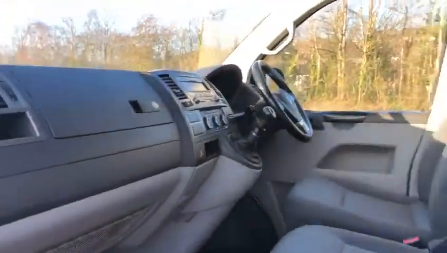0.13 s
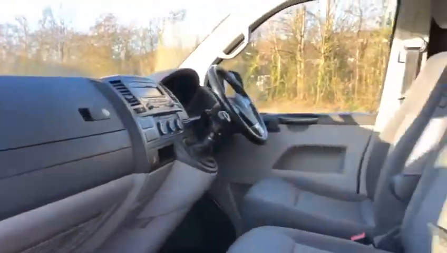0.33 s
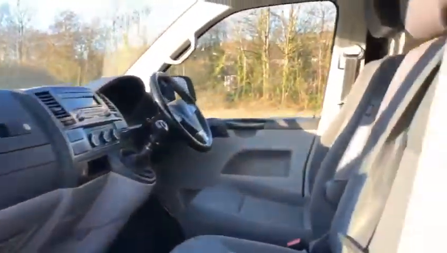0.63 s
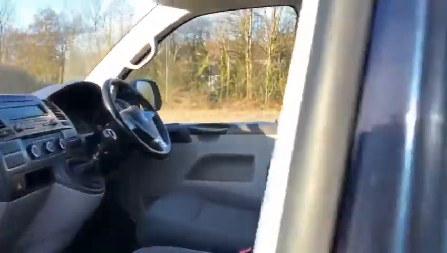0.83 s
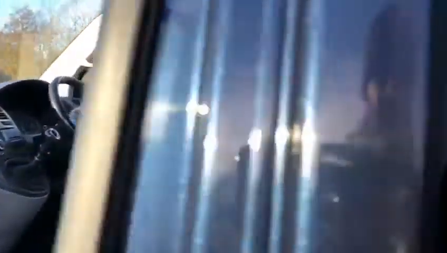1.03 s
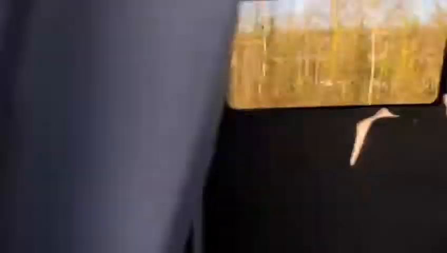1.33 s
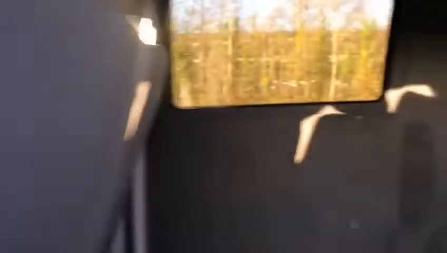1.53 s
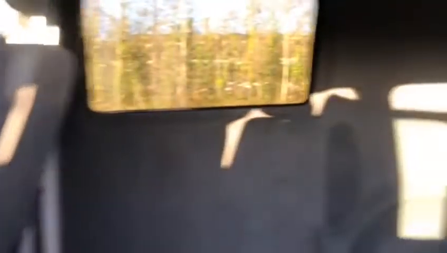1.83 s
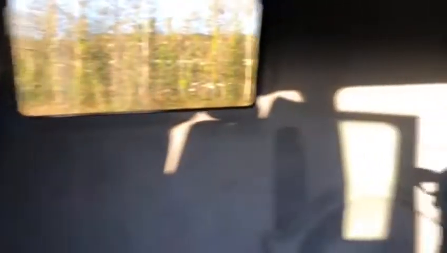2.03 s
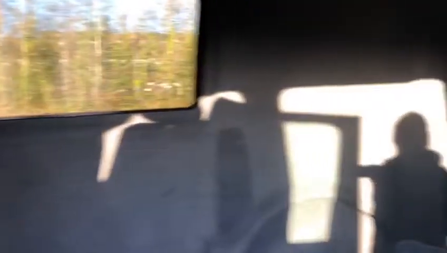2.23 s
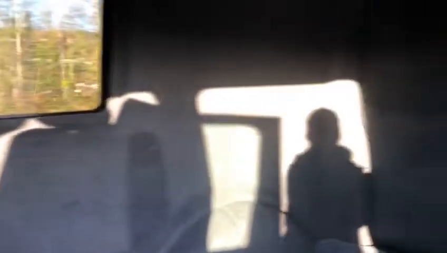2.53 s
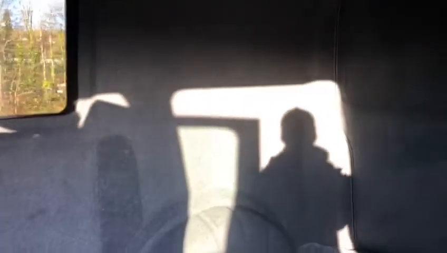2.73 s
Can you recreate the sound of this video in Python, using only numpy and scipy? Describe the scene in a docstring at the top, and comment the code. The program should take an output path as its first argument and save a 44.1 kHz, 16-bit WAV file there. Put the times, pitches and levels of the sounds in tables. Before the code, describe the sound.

A van's sliding door, close up in a quiet car park. Faint handle ticks and a click at 0.1 s, then a sharp crack and loud, deep multiple clunk at 0.2-0.35 s. Rollers rumble from about 0.6 s with uneven panel boom; a rough metallic squeak rises at 1.2-1.45 s. Small ticks follow, then a gritty rattle with thin steel whistles at 2.35-2.65 s, fading to faint hum.

```python
"""A van's sliding side door, heard from close by: its rollers rumble along the rails, as filtered noise.
Damped modes make the clunk of the door leaving its frame, and the knocks of the roller brackets.
Band-limited contacts make ticks of handle, latch and rollers; random slips on rail resonances make a squeak
on the bend; grit pings and steel whistles join the rattle over the catch near the end stop.
A quiet car park hums behind, as steady coloured noise."""
import sys
import numpy as np
from scipy import signal
from scipy.fft import rfft, irfft, next_fast_len
from scipy.io import wavfile
from scipy.ndimage import map_coordinates

SR = 44100
rng = np.random.default_rng(int(sys.argv[2]) if len(sys.argv) > 2 else 0)


def unload_wav(signal):
    """Save mono or channel-first audio to the path in sys.argv[1] as 16-bit WAV at rate SR, clipped to [-1, 1]."""
    wavfile.write(
        sys.argv[1],
        SR,
        np.round(np.clip(np.atleast_2d(signal).T, -1, 1) * 32767).astype(np.int16),
    )


def elevation(decibels):
    """Turn decibel levels (scalar or array-like) into linear amplitude ratios."""
    levels = np.asarray(decibels, float)
    return 10 ** (levels / 20)


N = 127890  # length [samples]

# Spectrum of the car park: (frequency [Hz], relative density [dB])
PARK_SPECTRUM = [(65, -7), (110, 6.5), (337, -14), (529, -8.5), (1330, -16), (6530, -36), (10300, -38.5),
                 (11300, -27), (12000, -73), (15600, -99), (22000, -120)]
PARK_DB = -48

# Answer of the load space to the metal sounds
CABIN_DB, CABIN_T60_S = -22.5, 0.072

# Grit crunching under the catch: (start [s], end [s], level [dB], grain rate [1/s], at most 99 grains)
GRIT_BURSTS = [(0.064, 0.214, -51.5, 260), (0.422, 0.483, -50, 830), (0.658, 0.846, -49.5, 730),
               (1.973, 2.05, -51.5, 900), (2.337, 2.498, -42.5, 600), (2.51, 2.667, -50.5, 300)]
GRAIN_HZ, GRAIN_OCTAVES, GRAIN_CYCLES, GRAIN_SPREAD_DB = 3500, 0.8, 5, 3

# Thin whistles of steel sliding on steel: (start [s], length [s], frequency [Hz], level [dB])
WHISTLE_TONES = [(2.35, .07, 8900, -49), (2.387, .032, 10200, -32), (2.415, .02, 10200, -48),
                 (2.378, .03, 3950, -46), (2.395, .03, 5100, -50), (2.4, .033, 2600, -40),
                 (2.565, .025, 3300, -50), (2.4, .012, 7600, -52), (2.355, .035, 2200, -45),
                 (2.37, .02, 5800, -54), (1.795, .05, 2750, -55), (2.275, .02, 3800, -50)]
WHISTLE_WAVER_RAD, WHISTLE_FLUTTER_DB = 0.65, 2.5

# Metal ticks of handle, latch and rollers:
# (time [s], level [dB], centre frequency [Hz], bandwidth scale [octaves], scatter t60 [s])
METAL_TICKS = [(.019, -29.5, 4840, 2.1, 0.037), (.028, -44, 7460, 0.25, 0.066),
               (.1, -20.5, 1110, 1.03, 0.06), (0.2149, -13.5, 4700, 1.3, 0.09),
               (0.217, -3.5, 5100, 1.2, 0.011), (0.22, -13.5, 2700, 0.74, 0.099),
               (0.102, -38, 4340, 0.16, 0.13), (0.098, -40, 6470, 0.4, 0.078),
               (.301, -20.5, 8300, 1.1, 0.055), (.308, -44, 7900, 1.2, 0.074),
               (0.318, -35, 6960, 0.77, 0.068), (0.325, -32, 3600, 0.39, 0.043),
               (.2755, -27.5, 3800, 0.96, 0.079), (0.231, -24.5, 3000, 0.42, .07),
               (.61, -52, 8500, .5, .05), (.707, -53, 5000, 1.2, 0.065), (0.727, -54, 4000, 1.6, .06),
               (0.791, -43, 8850, 0.71, 0.27), (2.009, -44, 5000, 1.6, 0.11), (2.131, -45, 5000, 0.87, .06),
               (.408, -45, 3360, 0.18, 0.054), (0.419, -40.5, 8800, 0.89, 0.23),
               (0.46, -39.5, 4900, 3.3, 0.083), (0.658, -43.5, 4950, 1.2, 0.15),
               (0.753, -39, 4000, 1.3, 0.12), (0.8241, -23.5, 2830, 1.36, 0.077),
               (1.069, -38, 3540, 0.99, 0.11), (1.138, -28.5, 7000, 0.77, 0.018),
               (1.327, -29.5, 2200, 3.1, 0.043), (1.451, -36.5, 5000, 0.97, 0.3),
               (1.595, -41.5, 7000, 1.2, 0.071), (1.651, -33, 3970, 2.6, 0.062),
               (1.7135, -44, 7000, 1.4, .05), (1.985, -43.5, 4000, 1.5, 0.16),
               (2.165, -40.5, 7060, 1.3, 0.07), (2.217, -31.5, 5800, 2.4, 0.06),
               (2.277, -40, 4000, 1.1, 0.071), (2.338, -55, 8000, 1, .04), (2.346, -21.5, 7040, 1.5, 0.035),
               (2.434, -30, 3470, 1.9, 0.036), (2.46, -32, 8100, .9, .03), (2.466, -15.5, 7900, 0.58, 0.04),
               (2.4665, -22, 2600, 1, 0.04), (2.346, -38, 2210, 0.58, 0.097), (2.521, -35, 3000, 1.4, .05),
               (2.535, -39, 6200, .2, .05), (2.535, -36, 3500, 0.33, 0.038), (2.521, -41, 9000, .5, 0.026),
               (2.41, -44, 3000, 0.59, .05), (2.559, -26.5, 2320, 0.67, 0.06),
               (2.593, -29, 4830, 0.67, 0.045), (2.638, -34, 3500, 0.3, 0.041),
               (2.646, -29, 2830, 0.54, 0.045)]

# Hollow knocks of the roller brackets:
# (time [s], relative level [dB], centre frequency [Hz], decay scale [times mode t60])
BRACKET_KNOCKS = [(.022, -20.5, 600, 0.69), (0.021, -28.5, 2140, 0.55), (.1, -19.5, 620, 0.76),
                  (.103, -38, 1600, 0.64), (0.22, -11, 1280, 0.59), (0.25, -12.5, 1350, 0.33),
                  (.283, -10, 750, 0.58), (.229, -10, 1000, .9), (.456, -23.5, 725, 0.89),
                  (.766, -29, 1200, 0.4), (0.825, -21, 1050, 1.3), (.828, -25.5, 2220, 1.6),
                  (1.327, -11, 980, 0.47), (0.061, -24.5, 1100, 0.63), (2.346, -30.5, 2400, 0.88),
                  (2.34, -26.5, 790, 1), (2.28, -21.5, 1800, 0.63), (2.468, -26.5, 1600, 0.39),
                  (2.521, -15.5, 800, 0.81), (2.4, -26, 1900, 1.4), (2.596, -21.5, 920, 0.59),
                  (2.561, -26, 900, 0.94), (2.476, -26, 900, 0.74), (2.646, -36.5, 2000, 2)]
# Modes of a bracket: (frequency [Hz], unscaled t60 [s])
BRACKET_MODES = [(610, 0.11), (790, 0.058), (965, 0.045), (1120, 0.036), (1400, 0.12), (1610, 0.051),
                 (1850, 0.048), (2150, 0.031), (2400, 0.03), (3240, 0.12)]
KNOCK_OCTAVES, MODE_SCATTER_DB = 0.4, 2

# A roller scraping on the bend, one level for each group of rail resonances in turn:
# (time [s], group 1 level [dB], group 2 level [dB], group 3 level [dB], group 4 level [dB])
SQUEAK_LEVELS = [(1.04, -63, -62, -59, -75), (1.086, -46, -52, -52, -73), (1.116, -62, -61, -57, -72),
                 (1.134, -51, -40, -52, -65), (1.184, -48, -56, -50, -67), (1.198, -38, -46, -50, -66),
                 (1.21, -31, -29, -37, -53), (1.22, -27, -37, -46, -46), (1.234, -20, -40, -48, -40),
                 (1.26, -30.5, -45, -61, -64), (1.268, -33, -42, -62, -46), (1.296, -30.5, -24, -38.5, -49),
                 (1.312, -32.5, -32, -45, -43), (1.33, -33, -28.5, -36, -70), (1.358, -49, -41, -66, -67),
                 (1.374, -29.5, -46, -41, -46), (1.392, -32, -42, -54, -55), (1.404, -32, -42, -50, -55),
                 (1.422, -44, -42, -54, -63), (1.466, -39, -31, -41, -67), (1.5, -46, -45, -54, -79),
                 (1.54, -51, -49, -52, -54.5), (1.582, -59, -72.5, -59, -72), (1.6, -52, -59, -63, -58)]
# Four groups of rail resonances, before sharpening: (frequency [Hz], width [Hz], gain [dB])
RAIL_GROUPS = [
    [(1860, 70, 0), (2030, 200, -8), (3760, 160, -12)],
    [(1585, 90, 0), (1700, 160, -2)],
    [(3100, 220, 0), (3350, 250, -2)],
    [(5700, 600, -4), (6440, 500, -3), (7570, 500, -3), (8700, 400, 0), (9400, 700, -3)],
]
SLIPS_PER_S, SLIP_SPREAD_DB = 1500, 3

# Door panels ringing as it rolls; the last two levels are relative to RING_SHARE_DB:
# (time [s], big panel level [dB], middle panels level [dB], small panels level [dB])
PANEL_LEVELS = [(0.4, -33, -24, -42), (0.45, -50, -32, -37), (0.62, -42.5, -32.5, -40),
                (0.69, -36, -26.5, -29), (0.77, -25, -26, -39), (0.86, -23.5, -23.5, -32.5),
                (0.89, -36, -40, -37), (0.92, -26, -22.5, -30), (1.03, -31, -31.5, -38),
                (1.07, -38, -20, -37), (1.1, -29, -30, -33.5), (1.22, -32, -26, -24.5),
                (1.25, -20.5, -26, -23), (1.31, -22.5, -48, -34), (1.34, -26, -17.5, -26),
                (1.4, -18.5, -30.5, -30), (1.53, -17, -26.5, -29), (1.56, -35, -29, -35),
                (1.59, -19.5, -33, -27), (1.74, -25.5, -40, -33), (1.76, -27.5, -34.5, -35),
                (1.85, -19.5, -24, -28), (1.87, -31, -39, -33), (1.89, -27, -22, -42),
                (1.98, -17.5, -32, -31), (2.11, -27, -30, -29.5), (2.19, -24, -27.5, -47),
                (2.23, -18, -35, -28.5), (2.36, -20.5, -27.5, -36), (2.38, -31.5, -38, -40),
                (2.44, -23, -51, -52), (2.47, -24.5, -24, -27), (2.5, -23, -41, -47),
                (2.54, -40, -41, -28.5), (2.58, -19.5, -43, -29), (2.64, -24.5, -41, -46),
                (2.69, -44, -36.5, -45), (2.73, -36, -35, -68), (2.79, -37, -46, -70),
                (2.85, -39, -53, -61)]
# Resonances of the middle panels: (frequency [Hz], width of one of two stages [Hz])
MIDDLE_PANELS = [(215, 32.3), (257, 41), (300, 38.4)]
# Resonances of the small panels: (frequency [Hz], width of one of two stages [Hz])
SMALL_PANELS = [(405, 40), (450, 51), (505, 52)]
BOOM_HZ, BOOM_WIDTH_HZ = 116.1, 25.9  # big panel, same columns
RING_SHARE_DB, PANEL_TOP_HZ = -3, 700
EVENNESS = 0.6  # 0 = free noise, 1 = steady strength

# The door jolting out of its frame:
# (time [s], strength [dB], contact softness [ms], extra level of the deep modes [dB])
DOOR_JOLTS = [(0.218, -15, 0.16, -17), (.229, -3.5, 1.4, -13), (.247, -5.5, 0.96, -2),
              (.276, -9.5, 0.66, 3.5), (.284, -13, 0.72, -7), (.297, -12.5, 0.78, -10),
              (0.326, -15, 1.8, -8)]
# Modes of the door: (frequency [Hz], relative level [dB], t60 [s])
DOOR_MODES = [(43.9, -2.5, 0.36), (62, -11.5, 0.6), (105, -20, 0.34), (153, -16, 0.29), (211.6, -6, 0.04),
              (266, -4, 0.26), (298.5, -4, 0.18), (356, -8.5, 0.31), (478, -5, 0.056), (588, -15, 0.17),
              (674, -9, 0.2), (840, -1.5, 0.033), (967, -8.5, 0.24), (1250, -18, .08), (1360, -32, 0.041),
              (1660, 3, 0.028), (1890, -26, 0.02)]
# Spectrum of loose panels shaken by a jolt: (frequency [Hz], relative density [dB])
CLATTER_SPECTRUM = [(71, -31), (120, 0.5), (297, -6), (884, -19), (987, -25), (1080, -22), (1650, -27),
                    (5000, -57), (6500, -81), (11000, -120)]
DEEP_HZ, CLATTER_DB, CLATTER_T60_S = 130, -2.5, 0.12

# Course of the rolling:
# (time [s], rumble level [dB], body sway over rumble [dB], rail hiss over rumble [dB])
ROLL_LEVELS = [(0.0, -50, -10, -26), (0.05, -36.5, -5, -19), (0.1, -36.5, -11, -15),
               (0.19, -35.5, -9, -10.5), (0.25, -38.5, 32.5, -7), (0.31, -32.5, 18.5, -35),
               (0.41, -34, 3, -50), (0.51, -34, 9, -53), (0.64, -30, -4, -28), (0.68, -30, 2, -22),
               (0.87, -25, -11.5, -30), (0.94, -31, 5.5, -23), (0.98, -27, -9, -24), (1.02, -30, 8.5, -23),
               (1.16, -24.5, -25, -12), (1.33, -22, -25, -9.5), (1.59, -28, -17, -20.5),
               (2.11, -28.5, -15, -22), (2.45, -28.5, 6, -20), (2.6, -25, -2.5, -19),
               (2.73, -38, 10.5, -30), (2.9, -60.5, 19, 8)]
# Spectrum of the rumble: (frequency [Hz], relative density [dB])
RUMBLE_SPECTRUM = [(70, -17), (100, -10), (170, -12.5), (330, -14.5), (580, -24), (800, -26.5),
                   (1150, -35.5), (1900, -43.5), (3000, -58), (3900, -78), (6600, -120)]
# Spectrum of the rail hiss: (frequency [Hz], relative density [dB])
HISS_SPECTRUM = [(1290, 6), (2200, -3), (2520, -1), (3720, -5), (4940, -14), (9030, -16), (11500, -31),
                 (12000, -47), (15600, -71), (22000, -120)]
# Spectrum of the slow body sway: (frequency [Hz], relative density [dB])
SWAY_SPECTRUM = [(15, -16), (40, 24), (70, 14), (95, 4), (130, -47.5)]
BUMPS_PER_S, BUMP_SPREAD_DB, BUMP_SHARE = 500, 2.5, 0.4  # grit under the rollers

MIC_TOP_HZ, MIC_ORDER = 10900, 9.7
CUT_HZ = 12290  # upper limit of the recorded band


def unit(x):
    """Normalisation: scale to rms 1."""
    return x / np.sqrt(np.mean(x ** 2) + 1e-20)


def curves(rows):
    """Linear interpolation: one value per sample for each column after the time."""
    s, *columns = np.transpose(rows)
    return [np.interp(np.arange(N) / SR, s, column) for column in columns]


def wobble(rate):
    """Spline interpolation: a smooth random curve through `rate` knots a second."""
    knots = rng.standard_normal(int(N * rate / SR) + 4)
    return map_coordinates(knots, [np.arange(N) * rate / SR])


def filtered(x, response):
    """Linear filtering: multiply the spectrum by a response of frequency."""
    m = next_fast_len(len(x) + 8192)
    return irfft(rfft(x, m) * response(np.fft.rfftfreq(m, 1 / SR)), m)[:len(x)]


def coloured(x, points):
    """Spectral shaping: filter by (Hz, dB) points on a log frequency axis, to rms 1."""
    f, db = np.transpose(points)
    return unit(filtered(x, lambda hz: elevation(np.interp(np.log(hz + 1), np.log(f + 1), db))))


def resonance(f, hz, width):
    """Band-pass resonance: the complex response of a damped oscillator, 1 at its centre."""
    return 1j * f * width / (hz * hz - f * f + 1j * f * width)


def add(track, s, sound):
    """Superposition: mix a sound in at a time in seconds."""
    part = track[round(s * SR):][:len(sound)]
    part += sound[:len(part)]


def car_park():
    """Stationary noise: a steady random hum with a fixed spectrum."""
    return elevation(PARK_DB) * coloured(rng.standard_normal(N), PARK_SPECTRUM)


def cabin(x):
    """Reverberation by convolution: the empty load space answers with a short decaying noise tail."""
    t = np.arange(SR // 4) / SR
    tail = rng.standard_normal(len(t)) * elevation(-60 * t / CABIN_T60_S) * (t > 0.004)
    return signal.fftconvolve(x, tail / np.linalg.norm(tail))[:N]


def grit():
    """Granular impact noise: many tiny damped pings at random times and pitches."""
    out, t = np.zeros(N), np.arange(SR // 50) / SR
    for start, end, db, per_s in GRIT_BURSTS:
        length = end - start
        for _ in range(min(int(per_s * length), 99)):
            when = start + rng.random() * length
            hz = min(GRAIN_HZ * 2 ** (GRAIN_OCTAVES * rng.standard_normal()), CUT_HZ)
            ping = np.sin(2 * np.pi * hz * t) * np.exp(-t * hz / GRAIN_CYCLES)
            add(out, when, elevation(db + GRAIN_SPREAD_DB * rng.standard_normal()) * ping)
    return out


def whistles():
    """Narrow-band oscillation: short, nearly pure tones swell and fade with wavering phase and level."""
    out, drift, flutter = np.zeros(N), wobble(rate=300), wobble(rate=200)
    for s, length, hz, db in WHISTLE_TONES:
        t = np.arange(round(length * SR)) / SR
        here = slice(round(s * SR), round(s * SR) + len(t))
        phase = 2 * np.pi * hz * t + WHISTLE_WAVER_RAD * drift[here]
        level = elevation(db + WHISTLE_FLUTTER_DB * flutter[here])
        add(out, s, level * np.sin(np.pi * t / length) * np.sin(phase))
    return out


def ticks():
    """Impulse excitation: a sharp contact and a dying scatter share a band around each tick's pitch."""
    out, t = np.zeros(N), np.arange(SR // 4) / SR
    for s, db, hz, octaves, t60 in METAL_TICKS:
        band = lambda f: np.exp(-(np.log2((f + 1) / hz) / octaves) ** 2)
        scatter = unit(filtered(rng.standard_normal(len(t)), band))
        scatter *= elevation(-60 * t / t60) * (1 - np.exp(-t * hz / 2))
        impulse = 1.0 * (np.arange(len(t)) == round(SR / hz))  # one period in
        contact = filtered(impulse, band)
        add(out, s, elevation(db) * (0.32 * scatter + contact / contact.max()))
    return out


def knocks():
    """Modal excitation: each knock rings most the bracket modes nearest its centre frequency."""
    out, t = np.zeros(N), np.arange(SR // 5) / SR
    for s, db, centre_hz, scale in BRACKET_KNOCKS:
        ring = np.zeros(len(t))
        for hz, t60 in BRACKET_MODES:
            weight = np.exp(-(np.log2(hz / centre_hz) / KNOCK_OCTAVES) ** 2)
            decay = elevation(MODE_SCATTER_DB * rng.normal() - 60 * t / (t60 * scale))
            ring += weight * decay * np.sin(2 * np.pi * hz * t + rng.uniform(0, 2.65))
        add(out, s, elevation(db) * ring * (1 - np.exp(-t / 0.00024)) / 2)
    return out


def squeak():
    """Stick-slip friction: uneven slips drive fixed rail resonances, whose groups come and go."""
    t, out = np.arange(N) / SR, np.zeros(N)
    fade_in = np.clip((t - SQUEAK_LEVELS[0][0]) / 0.026, 0, 1)
    fade_out = np.clip((SQUEAK_LEVELS[-1][0] - t) / 0.02, 0, 1)
    for db, group in zip(curves(SQUEAK_LEVELS), RAIL_GROUPS):
        slips = (rng.random(N) < SLIPS_PER_S / SR) * rng.standard_normal(N)
        slips *= elevation(SLIP_SPREAD_DB * wobble(rate=70))
        # neighbouring resonances alternate in sign
        rail = lambda f: sum((-1) ** k * elevation(gain) * resonance(f, hz, width)
                             for k, (hz, width, gain) in enumerate(group))
        sharpen = lambda f: np.abs(rail(f)) ** 0.5 * (f > 900)
        out += elevation(db) * unit(filtered(filtered(slips, rail), sharpen))
    return out * fade_in * fade_out


def panel_ring(modes):
    """Forced resonance: noise rings panel modes, then its envelope is partly evened out."""
    ring = filtered(rng.standard_normal(N),
                    lambda f: sum(resonance(f, hz, width) ** 2 for hz, width in modes))
    even = ring / np.abs(signal.hilbert(ring)) ** EVENNESS
    return unit(filtered(even, lambda f: np.exp(-(f / PANEL_TOP_HZ) ** 4) * (f > 60)))


def panels():
    """Plate resonance: rail roughness rings big, middle and small door panels, each with its own level."""
    boom_db, middle_db, small_db = curves(PANEL_LEVELS)
    t = np.arange(N) / SR
    fade_in = np.clip((t - PANEL_LEVELS[0][0]) / 0.017, 0, 1)
    fade_out = np.clip((PANEL_LEVELS[-1][0] - t) / 0.031, 0, 1)
    boom = elevation(boom_db) * panel_ring([(BOOM_HZ, BOOM_WIDTH_HZ)])
    middle = elevation(middle_db) * panel_ring(MIDDLE_PANELS)
    small = elevation(small_db) * panel_ring(SMALL_PANELS)
    return fade_in * fade_out * (boom + elevation(RING_SHARE_DB) * (middle + small))


def clunk():
    """Modal impact: each jolt rings the door's modes through a soft contact and shakes loose panels."""
    out, t = np.zeros(N), np.arange(SR // 2) / SR
    for s, db, soft_ms, deep_db in DOOR_JOLTS:
        ring = np.zeros(len(t))
        for hz, level, t60 in DOOR_MODES:
            mode_db = level + deep_db * (hz < DEEP_HZ) + rng.normal(0, 0.77)
            softening = 1 + (hz * soft_ms / 500) ** 2  # a longer contact excites less treble
            ring += elevation(mode_db - 60 * t / t60) * np.sin(2 * np.pi * hz * t) / softening
        shaken = coloured(rng.standard_normal(len(t)), CLATTER_SPECTRUM)
        shaken *= elevation(CLATTER_DB - 60 * t / CLATTER_T60_S) * (1 - np.exp(-t / 0.001))
        add(out, s, elevation(db) * (ring * (1 - np.exp(-t / 0.00023)) + shaken))
    return out


def roughness(per_s):
    """Random excitation: sparse bumps of grit, `per_s` a second on average, over the rail's white noise."""
    bumps = (rng.random(N) < per_s / SR) * rng.standard_normal(N)
    bumps *= elevation(BUMP_SPREAD_DB * rng.standard_normal(N))
    return BUMP_SHARE * unit(bumps) + rng.standard_normal(N)


def rolling():
    """Rolling noise: grit and rail roughness shake the door into a broad rumble, a slow sway and a hiss."""
    rumble_db, sway_db, hiss_db = curves(ROLL_LEVELS)
    shake_db = 1.09 * wobble(rate=14.036)  # shared by all three
    rumble = elevation(shake_db) * coloured(roughness(BUMPS_PER_S), RUMBLE_SPECTRUM)
    sway = elevation(sway_db + 0.23 * shake_db) * coloured(rng.standard_normal(N), SWAY_SPECTRUM)
    flicker_db = 0.53 * shake_db + 2.47 * wobble(rate=35)
    hiss = elevation(hiss_db + flicker_db) * coloured(roughness(BUMPS_PER_S / 4), HISS_SPECTRUM)
    return elevation(rumble_db) * (rumble + sway + hiss)


def scene():
    """Superposition: the car park, the small metal parts with their reverberation, and the door."""
    metal = grit() + whistles() + ticks() + knocks() + squeak()
    door = panels() + clunk() + rolling()
    return (car_park() + elevation(CABIN_DB) * cabin(metal) + metal + door)[None]


def band_limit(x):
    """A steep low-pass at the top of the band."""
    return signal.sosfilt(signal.butter(12, 12290, fs=SR, output="sos"), x)


def record(dry):
    """Saturation and band limiting: the loudest peaks round off, then the deepest bass and top treble fade."""
    top, hard = 1.1, 4  # limiting amplitude, sharpness of the knee
    soft = dry / (1 + np.abs(dry / top) ** hard) ** (1 / hard)
    bass = lambda f: f / (f + 5)
    treble = lambda f: (f < CUT_HZ) / np.sqrt(1 + (f / MIC_TOP_HZ) ** (2 * MIC_ORDER))
    heard = filtered(soft[0], lambda f: bass(f) * treble(f))
    return band_limit(heard[None])


dry = scene()
out = record(dry)
unload_wav(out)
```